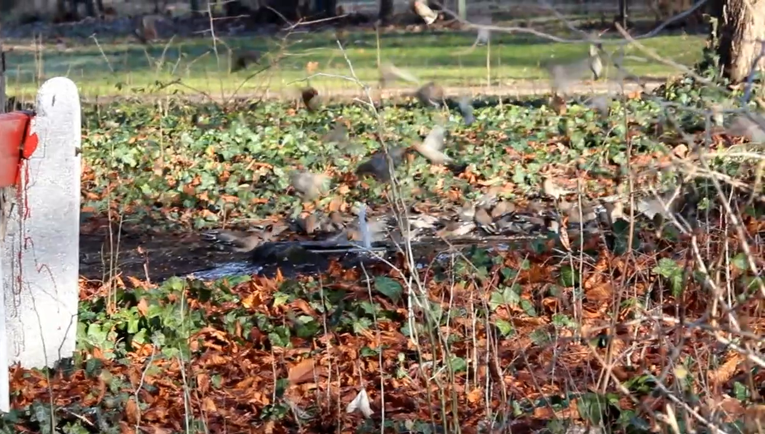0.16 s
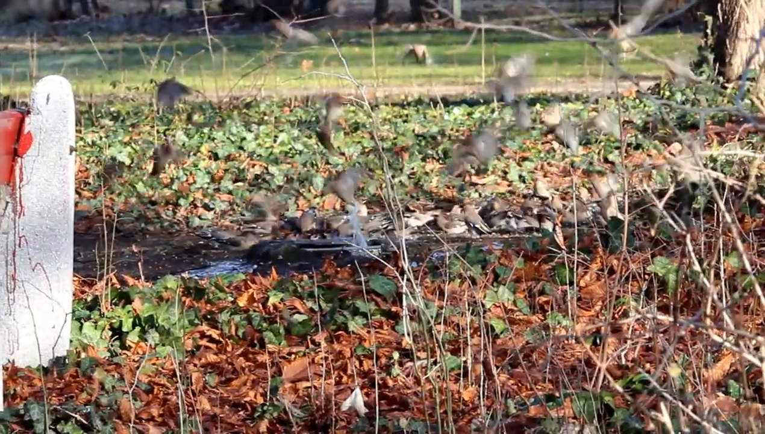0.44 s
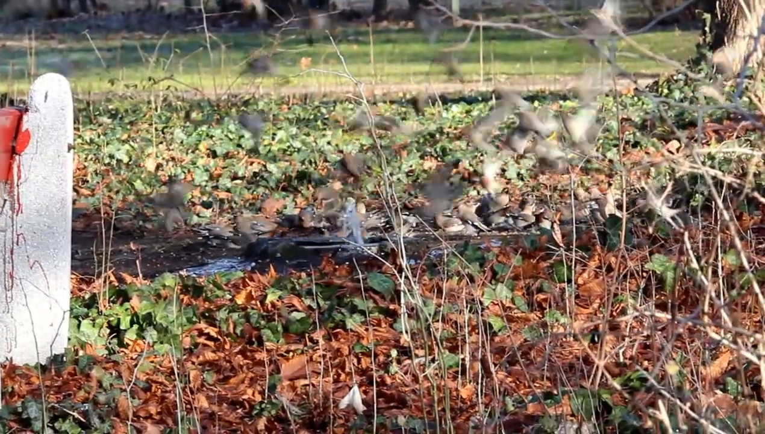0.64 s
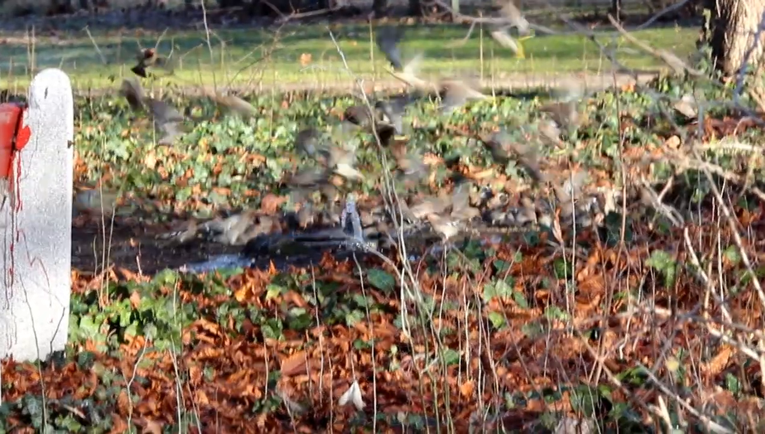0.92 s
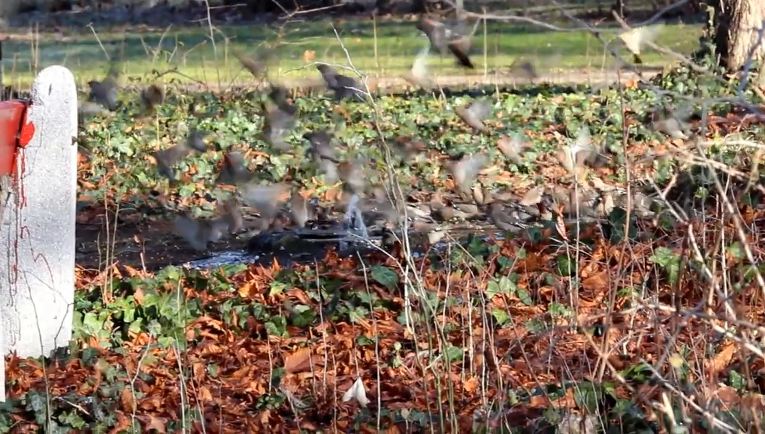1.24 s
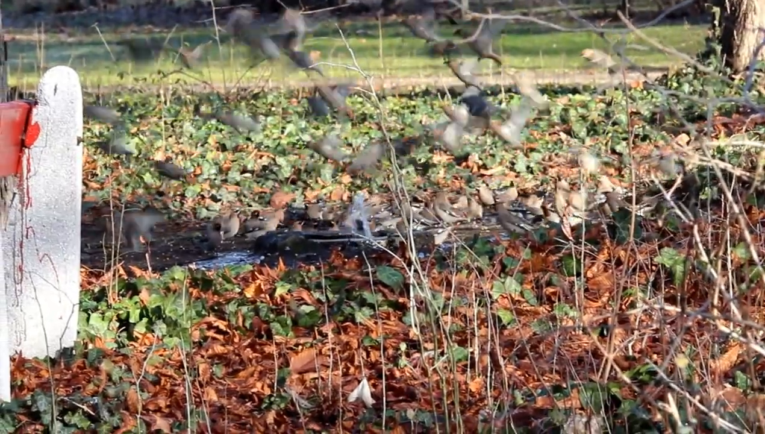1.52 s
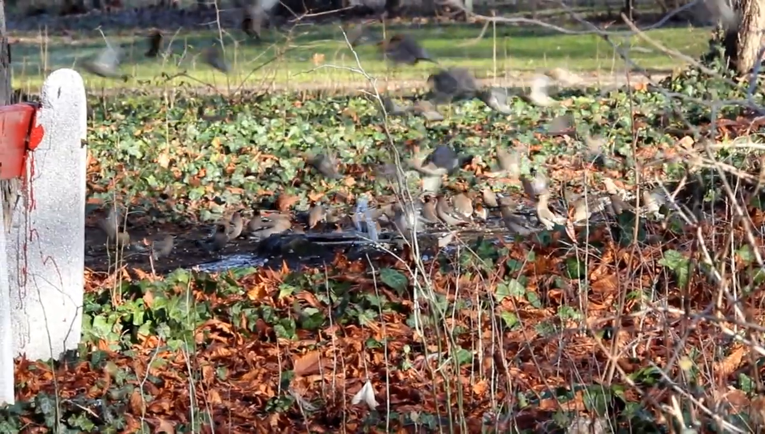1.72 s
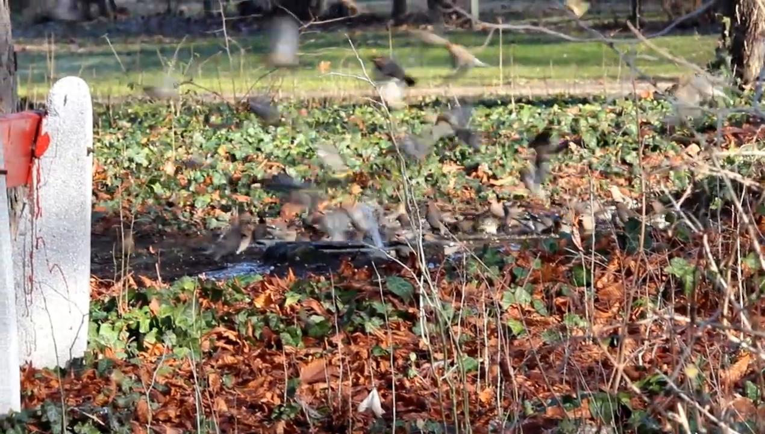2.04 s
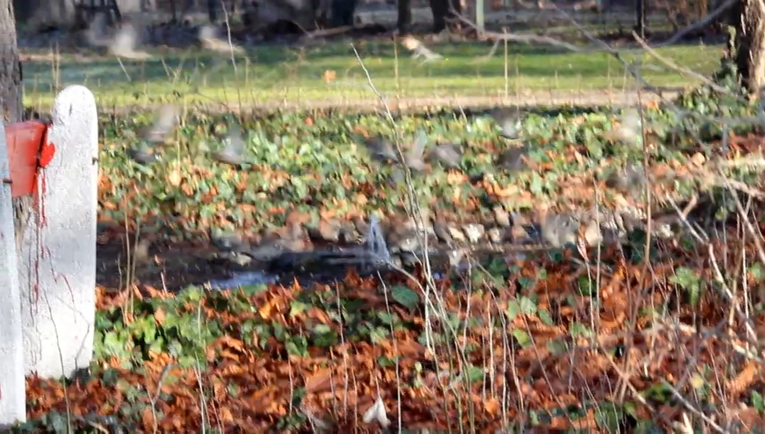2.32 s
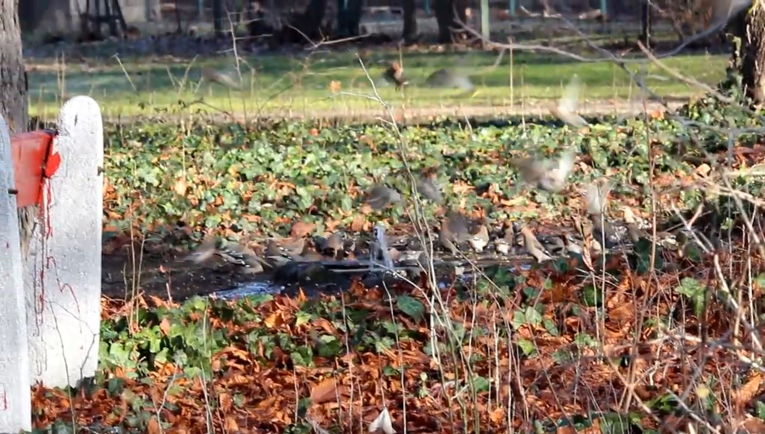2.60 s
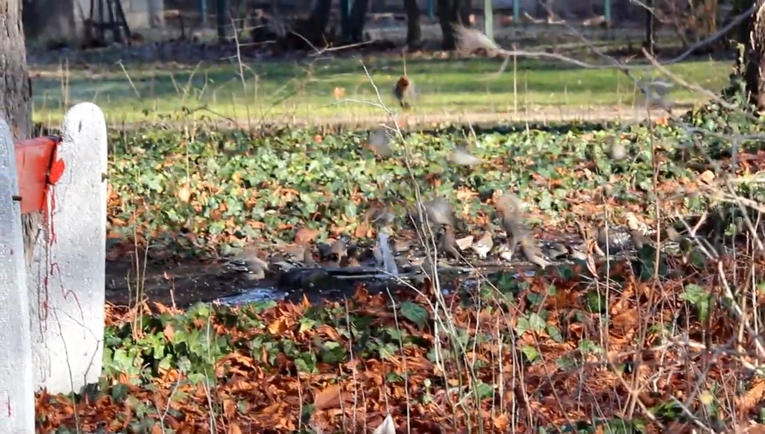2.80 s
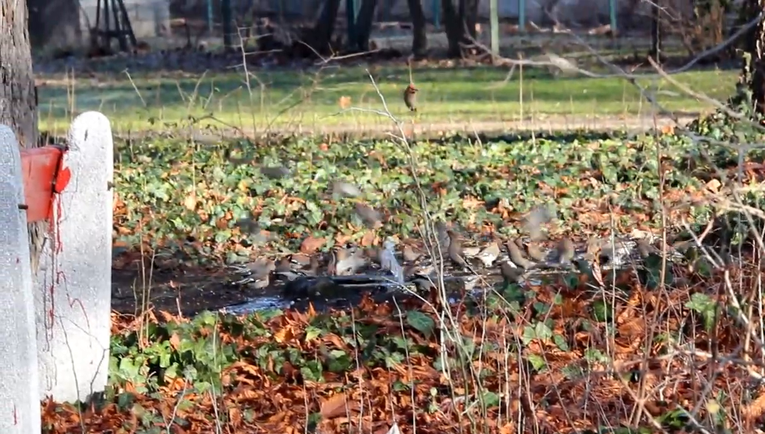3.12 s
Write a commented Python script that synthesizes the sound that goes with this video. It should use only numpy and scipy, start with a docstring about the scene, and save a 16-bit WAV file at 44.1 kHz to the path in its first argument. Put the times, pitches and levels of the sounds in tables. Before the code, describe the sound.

Near the microphone, thin high bird trills start after a brief lead-in, thicken, pause around two and a half seconds, then resume; feathers flutter, drops tick, and distant engines throb low behind.

```python
"""In a park, a flock of waxwings trills while it flutters round a puddle close to the microphone.
Each trill is a string of falling whistled notes: gliding sines with a weak octave, from near and farther birds.
Lower chirps and a thin high squeal are gliding sines too; wings, drops and dry leaves are shaped noise.
Distant traffic is a soft stereo roar of filtered noise; two engines, low tones with weak overtones,
beat against each other. A few reflections and a short diffuse tail surround the birds."""
import sys
import numpy as np
from scipy import signal
from scipy.fft import rfft, irfft
from scipy.io import wavfile
from scipy.ndimage import uniform_filter1d

SR = 44100
rng = np.random.default_rng(int(sys.argv[2]) if len(sys.argv) > 2 else 0)


def bounce(signal):
    """Save signal as a 16-bit WAV file at the path given by the first command-line argument."""
    frames = np.transpose(np.atleast_2d(signal))
    limited = np.clip(frames, -1, 1)
    pcm = np.round(limited * 32767).astype(np.int16)
    wavfile.write(sys.argv[1], SR, pcm)


N = 143766
TIME = np.arange(N) / SR

# Near trill notes: (time of the top [s], fall [s], top [Hz], end [Hz], level before NOTE_DB and throat [dB])
TRILL_NOTES = [(0.018, 0.039, 7530, 5780, -60.5), (0.045, 0.033, 6020, 5600, -66),
               (0.095, 0.035, 6200, 5480, -72), (0.279, 0.03, 6340, 5900, -47.5),
               (0.327, 0.033, 6800, 5800, -46.5), (0.377, 0.038, 6480, 5750, -46.5),
               (0.43, 0.036, 6640, 5800, -47), (0.5, 0.027, 6940, 5980, -63),
               (0.534, 0.035, 5980, 5410, -57), (0.585, 0.03, 5960, 5180, -57),
               (0.635, 0.039, 6260, 5460, -56), (0.69, 0.042, 5900, 5230, -57),
               (0.748, 0.036, 6230, 5730, -52.5), (0.803, 0.037, 6100, 5270, -57),
               (0.857, 0.036, 6030, 5550, -54), (0.913, 0.039, 6050, 5300, -57),
               (0.968, 0.033, 6000, 5380, -60), (1.036, 0.025, 5680, 5220, -60),
               (1.09, 0.032, 5780, 5600, -60), (1.12, 0.023, 6700, 5980, -56),
               (1.168, 0.035, 7130, 5720, -57), (1.195, 0.03, 5900, 5600, -61),
               (1.228, 0.039, 6900, 5960, -58), (1.272, 0.038, 6780, 6380, -57),
               (1.28, 0.037, 6300, 5560, -66), (1.314, 0.04, 7300, 5980, -57),
               (1.34, 0.036, 5970, 5300, -61), (1.365, 0.03, 7240, 6000, -57),
               (1.4, 0.035, 5820, 5650, -57), (1.42, 0.038, 7030, 6040, -53),
               (1.45, 0.035, 6000, 5380, -62), (1.47, 0.03, 6980, 6080, -55.5),
               (1.505, 0.035, 6350, 5510, -57), (1.559, 0.04, 6150, 5560, -61),
               (1.575, 0.025, 7060, 6420, -60), (1.635, 0.047, 7110, 6840, -61),
               (1.75, 0.034, 6130, 5450, -53.5), (1.776, 0.027, 6570, 6160, -54),
               (1.805, 0.029, 6240, 5330, -52), (1.822, 0.035, 7070, 6160, -52),
               (1.853, 0.037, 6020, 5510, -53.5), (1.872, 0.028, 7180, 6120, -54),
               (1.897, 0.029, 6180, 5450, -51.5), (1.922, 0.035, 7180, 5890, -52.5),
               (1.952, 0.033, 5970, 5500, -51.5), (1.972, 0.028, 7040, 6180, -58),
               (1.997, 0.033, 6060, 5420, -52.5), (2.025, 0.03, 6760, 5920, -56),
               (2.052, 0.036, 6020, 5640, -52.5), (2.098, 0.029, 5910, 5530, -52),
               (2.15, 0.047, 6160, 5500, -53), (2.203, 0.039, 5930, 5420, -51.5),
               (2.257, 0.048, 6090, 5460, -51), (2.635, 0.022, 6700, 5660, -58),
               (2.645, 0.062, 7670, 6700, -61.5), (2.668, 0.032, 6400, 5850, -58),
               (2.712, 0.044, 6900, 5720, -54), (2.768, 0.035, 6660, 5860, -55),
               (2.824, 0.034, 6524, 5810, -55.5), (2.86, 0.035, 5860, 5500, -60),
               (2.888, 0.033, 6970, 6240, -57), (2.942, 0.035, 7100, 6140, -57),
               (2.988, 0.031, 7200, 6100, -56), (3.02, 0.027, 5620, 5280, -62),
               (3.043, 0.04, 7120, 5880, -57), (3.12, 0.034, 5820, 5390, -66),
               (3.18, 0.039, 5600, 5630, -58), (3.232, 0.027, 5620, 5220, -63)]
# How strongly the throat passes each pitch: (pitch [Hz], gain [dB])
THROAT_GAIN = [(5100, 0), (5450, -3), (5680, -0.5), (5950, -3), (6250, -1), (6700, -2), (7200, 2.5),
               (7800, -3)]
# Farther birds of the flock, all together: (time [s], level [dB])
FAR_FLOCK_LEVEL = [(0, -69), (.3, -60), (.6, -64), (.85, -60.5), (1.05, -62), (1.3, -59.5), (1.65, -65),
                   (1.9, -65), (2.25, -61), (2.42, -66), (2.6, -84), (2.75, -61.5), (3, -64), (3.26, -64)]
# Lower chirps: (time [s], length [s], start [Hz], end [Hz], peak sine level [dB])
LOW_CHIRPS = [(.267, 0.017, 3680, 2900, -51), (.333, .021, 4100, 2880, -49), (.407, 0.017, 4000, 2940, -47),
              (2.347, .02, 3470, 2630, -55)]
# The two voices of the high squeal: (time [s], mean pitch [Hz], mean level [dB])
UPPER_SQUEAL = [(.41, 12390, -66), (.428, 13040, -62), (.475, 12950, -58), (.492, 12750, -64),
                (.52, 13050, -62), (.542, 13000, -70), (.562, 13000, -64), (.578, 12850, -58),
                (.592, 12240, -68), (.62, 11500, -69)]
LOWER_SQUEAL = [(.44, 10800, -67), (.456, 10570, -68), (.52, 10480, -64), (.545, 10350, -73),
                (.572, 10100, -66), (.608, 9180, -71), (.63, 8930, -72)]
# Single close wing flaps: (time [s], level before the puff envelope [dB])
CLOSE_FLAPS = [(.745, -56), (.79, -53), (.828, -55), (1.165, -52.5), (1.256, -58), (1.29, -52),
               (1.345, -59), (1.462, -50), (1.815, -56), (1.922, -53), (1.982, -54), (2.04, -54),
               (2.748, -54), (2.77, -53), (2.815, -54), (2.85, -50), (2.89, -51.5), (2.928, -52),
               (3.037, -51), (3.088, -52), (3.165, -53)]
# Rustle of all the beating wings: (time [s], level [dB])
WING_LEVEL = [(0, -74), (.3, -59), (.55, -57), (.9, -56), (1.4, -58.5), (1.7, -56.5), (1.95, -57.5),
              (2.3, -57.5), (2.55, -66), (2.8, -60), (3.26, -56.5)]
# Relative spectrum of the feathers: (frequency [Hz], gain [dB])
WING_SPECTRUM = [(200, 2), (900, -6), (1800, 3), (3500, -2), (5000, -3.5), (8000, -13.5), (15000, -16.5)]
# Drops and dry leaves: (time [s], level before the decay envelope [dB], centre [Hz], width [octaves])
CLEAR_TICKS = [(0.361, -36, 9100, 0.43), (.414, -48, 11000, .6), (.808, -46, 9900, .5),
               (.9275, -33.5, 2100, 0.65), (0.953, -39, 10000, .3), (.986, -39, 9500, .4),
               (1.008, -45, 10980, .3), (1.043, -43, 2190, 0.64), (1.2525, -37, 6500, .8),
               (1.40, -39, 2300, .7), (1.419, -39.5, 7900, .6), (1.542, -34, 2380, 1),
               (1.587, -43, 11000, 0.44), (1.622, -37.5, 3800, 0.77), (1.674, -44, 11000, 0.17),
               (1.92, -38.5, 2560, 0.51), (1.972, -38, 2100, 0.42), (2.166, -40, 2500, 0.72),
               (2.349, -43.5, 10980, 0.52), (2.389, -45, 10500, .4), (2.633, -45, 7975, 0.52),
               (2.768, -41, 6000, 0.92), (2.859, -35, 8000, .25), (3.081, -42, 10500, 0.62),
               (3.1941, -32.5, 2550, 0.28)]
# Reflections from ground and trunks: (delay [s], gain [dB])
GROUND_AND_TRUNKS = [(.0031, -24.5), (.0074, -15.5)]
# Engines: (time [s], firing rate [Hz], level before overtone gains and drift [dB])
UPPER_ENGINE = [(0, 69, -46.5), (.4, 70.36, -40), (.65, 70.56, -46.5), (.8, 71.34, -50.5),
                (1.25, 71.43, -39.5), (1.7, 72.96, -41.5), (2.3, 74.53, -40.5), (2.6, 75.7, -48.5),
                (3.26, 74.6, -53)]
LOWER_ENGINE = [(0, 60.8, -45), (.45, 62.03, -47), (.8, 59.78, -46), (1.0, 59.4, -44.5), (1.3, 59.9, -42.5),
                (1.85, 58, -46), (2.4, 56.2, -45), (2.8, 55.7, -61), (3.26, 58.3, -47)]
# Gain of the firing rate and its overtones, in order: (gain [dB])
ENGINE_HARMONICS = [0.5, -14.5, -21]
# Relative spectrum of the far road: (frequency [Hz], gain [dB])
ROAD_SPECTRUM = [(15, -29), (30, -12), (55, 0.5), (85, 0.5), (110, -3.5), (170, -5), (320, -10.5),
                 (450, -11), (700, -10), (1000, -11.5), (1350, -17.5), (2000, -24), (3200, -29),
                 (5000, -32), (8000, -35), (10000, -36), (13000, -36), (16000, -39.5)]
# Left-right likeness of the road noise: (frequency [Hz], correlation [0 to 1])
ROAD_LIKENESS = [(20, 1), (1500, 1), (2800, 1), (5000, 0.91), (8000, .7), (16000, 0.58)]
# Road noise before its slow swell: (time [s], level [dB])
ROAD_LEVEL = [(0, -42.5), (.45, -41), (.8, -42), (1.4, -41), (2.0, -41.5), (2.45, -41.5), (2.9, -41),
              (3.26, -43)]

# Trill note: trim, flick up to the top, drop after the fall
NOTE_DB, RISE_S, RISE_HZ, RELEASE_S, DROP_HZ = 2.5, 0.008, 850, 0.006, 350
# Swell over the fall (LOUDEST_AT is a fraction of it), bow of the pitch slide, level of the octave
ONSET_DB, END_DB, LOUDEST_AT, SAG_HZ, OCTAVE_DB = -5.5, -7.5, 0.76, 59.6, -23
WAVER_HZ, SHIMMER_DB = 74, 2  # rms unsteadiness of pitch and of near level
# Farther birds: mean pitches of the lowest bird, spread up to the highest, typical spacing of notes
FAR_TOP_HZ, FAR_END_HZ, FAR_SPREAD_HZ, NOTE_GAP_S = 5920, 5450, 1400, 0.053
SCATTER_T60_S = 0.47
FLAP_S, FLAP_HZ, FLAP_OCTAVES = 0.006, 3150, 0.85
WINGBEATS_PER_S, WING_DEPTH_DB = 18, 4  # mean rate; swing each way
# Tick decay; mean rate and lowest level of the faint patter, before the decay envelope
TICK_DECAY_S, SPLASH_PER_S, SPLASH_DB = 0.00097, 70, -58
TAIL_T60_S, TAIL_DB = 0.33, -17
PATCH_DB, SWELL_DB = 1.15, 0.4  # rms unevenness of the road spectrum and of its level
EDGE_HZ = 15900


def amp(db):
    """Decibels to gain."""
    return 10 ** (np.asarray(db) / 20)


def unit(x):
    """Scales to rms 1."""
    return x / np.sqrt(np.mean(x ** 2) + 1e-20)


def at_hz(points, hz):
    """Reads a spectrum on a log-frequency axis."""
    f, value = np.transpose(points)
    return np.interp(np.log(hz + 1), np.log(f + 1), value)


def at_time(rows, t):
    """Reads every column of a curve at the times t."""
    s, *columns = np.transpose(rows)
    return [np.interp(t, s, c) for c in columns]


def add(mix, s, sound):
    """Mixes a sound in at s seconds, trimmed at the ends of the mix."""
    start = round(s * SR)
    sound = sound[max(-start, 0):]
    part = mix[max(start, 0):][:len(sound)]
    part += sound[:len(part)]


def wander(rate_hz):
    """Smooth random drift of rms 1."""
    hz = np.fft.rfftfreq(N, 1 / SR)
    return unit(irfft(rfft(rng.standard_normal(N)) * np.exp(-(hz / rate_hz) ** 2), N))


def phase_of(hz):
    """Running phase of a pitch curve."""
    return 2 * np.pi * np.cumsum(hz) / SR


def band(noise, centre_hz, octaves):
    """Noise narrowed round one frequency, at rms 1."""
    hz = np.fft.rfftfreq(len(noise), 1 / SR)
    distance = np.log2((hz + 1) / centre_hz) / octaves
    return unit(irfft(rfft(noise) * np.exp(-0.5 * distance ** 2)))


def note(fall_s, top_hz, end_hz, waver):
    """One trill note: the whistle flicks up, slides down as it swells, and drops away."""
    t = np.arange(-RISE_S, fall_s + RELEASE_S, 1 / SR)
    u = np.clip(t / fall_s, 0, 1)
    before = np.clip(-t / RISE_S, 0, 1)
    after = np.clip((t - fall_s) / RELEASE_S, 0, 1)
    hz = top_hz + (end_hz - top_hz) * u - SAG_HZ * np.sin(np.pi * u)
    hz = hz - RISE_HZ * before ** 2 - DROP_HZ * after
    phase = phase_of(hz + WAVER_HZ * waver[:len(t)])
    swell_db = np.interp(u, [0, LOUDEST_AT, 1], [ONSET_DB, 0, END_DB])
    envelope = np.sqrt(2 * (1 - before ** 2)) * (1 - after) * amp(swell_db + at_hz(THROAT_GAIN, hz))
    return envelope * (np.sin(phase) + amp(OCTAVE_DB) * np.sin(2 * phase))


def near_trills():
    """The birds nearest the microphone, whistled note by note with a shimmering level."""
    out, waver = np.zeros(N), wander(300)
    for s, fall_s, top_hz, end_hz, db in TRILL_NOTES:
        whistle = note(fall_s, top_hz, end_hz, np.roll(waver, -round(s * SR)))
        add(out, s - RISE_S, amp(db + NOTE_DB) * whistle)
    return out * amp(SHIMMER_DB * wander(180))


def far_trills(count=8):
    """Farther birds trill on, each round its own pitch at an uneven pace, blurred by the trees."""
    out, waver = np.zeros(N), wander(300)
    for height in np.linspace(0, 1, count) ** 2:
        top_hz = FAR_TOP_HZ + FAR_SPREAD_HZ * height
        end_hz = FAR_END_HZ + FAR_SPREAD_HZ * height / 2
        s = -rng.random() * NOTE_GAP_S
        for pace, pitch in rng.standard_normal((70, 2)):
            shift_hz = 130 * pitch
            add(out, s, note(0.027, top_hz + shift_hz, end_hz + shift_hz, np.roll(waver, -round(s * SR))))
            s += NOTE_GAP_S * np.exp(0.061 * pace)
    t = TIME[:SR // 2]
    scatter = rng.standard_normal(len(t)) * amp(-60 * t / SCATTER_T60_S)
    blurred = signal.fftconvolve(out, scatter)[:N]
    return unit(blurred) * amp(at_time(FAR_FLOCK_LEVEL, TIME)[0])


def chirps():
    """Short, steeply falling sine chirps below the trills, each swelling and fading."""
    out = np.zeros(N)
    for s, length, start_hz, end_hz, db in LOW_CHIRPS:
        u = np.arange(0, length, 1 / SR) / length
        phase = phase_of(start_hz + (end_hz - start_hz) * u ** 0.836)
        add(out, s, amp(db) * np.sqrt(2) * np.sin(np.pi * u) * np.sin(phase))
    return out


def squeal(voice):
    """One thin voice of the high squeal: a sine unsteady in pitch and level."""
    hz, db = at_time(voice, TIME)
    sounding = (TIME > voice[0][0]) & (TIME < voice[-1][0])
    gate = uniform_filter1d(1.0 * sounding, size=200)  # softened edges
    level = np.sqrt(2) * gate * amp(db + 2 * wander(120))
    return level * np.sin(phase_of(hz + 70 * wander(300)))


def flaps():
    """Soft puffs from the wings of the closest birds: band noise under a bell-shaped envelope."""
    out = np.zeros(N)
    for (s, db), noise in zip(CLOSE_FLAPS, rng.standard_normal((len(CLOSE_FLAPS), 2048))):
        t = TIME[:len(noise)] - TIME[len(noise) // 2]
        puff = band(noise, FLAP_HZ, FLAP_OCTAVES) * np.exp(-0.5 * (t / FLAP_S) ** 2)
        add(out, s + t[0], amp(db) * puff)
    return out


def wings(count=3):
    """Feathers of a few birds: coloured noise that puffs up on every wing beat."""
    out, hz = np.zeros(N), np.fft.rfftfreq(N, 1 / SR)
    for _ in range(count):
        rustle = irfft(rfft(rng.standard_normal(N)) * amp(at_hz(WING_SPECTRUM, hz)), N)
        rate = WINGBEATS_PER_S * (1 + 0.147 * wander(4.04))
        beat = np.sin(phase_of(rate) + 2 * np.pi * rng.random())
        out += rustle * amp(WING_DEPTH_DB * beat + 4.5 * wander(6.7))
    return unit(out) * amp(at_time(WING_LEVEL, TIME)[0])


def tick(centre_hz, octaves, noise):
    """A tiny burst of band noise with a sharp onset that dies within milliseconds."""
    t = TIME[:len(noise)]
    return band(noise, centre_hz, octaves) * np.exp(-t / TICK_DECAY_S) * (1 - np.exp(-t / 0.00012))


def ticks():
    """Drops and dry leaves: clear ticks close by, and a randomly timed patter of mostly fainter ones."""
    out = np.zeros(N)
    for (s, db, centre_hz, octaves), noise in zip(CLEAR_TICKS, rng.standard_normal((len(CLEAR_TICKS), 1024))):
        add(out, s - TICK_DECAY_S / 2, amp(db) * tick(centre_hz, octaves, noise))
    s = 0
    for (wait, pitch, loud), noise in zip(rng.random((300, 3)), rng.standard_normal((300, 1024))):
        s -= np.log(1 - wait) / SPLASH_PER_S  # exponential waiting times
        centre_hz = 2100 * 5 ** (pitch ** 2)
        add(out, s, amp(SPLASH_DB + 12.4 * loud ** 2) * tick(centre_hz, 0.54, noise))
    return out


def park(x):
    """The place round the birds: ground and trunk reflections, then a short diffuse stereo tail."""
    t = np.arange(SR // 2) / SR
    decay = amp(-60 * t / TAIL_T60_S) * (1 - np.exp(-t / 0.012))
    mid, side = rng.standard_normal((2, len(t))) * decay
    response = np.array([mid + 0.1 * side, mid - 0.1 * side])
    response *= amp(TAIL_DB) / np.linalg.norm(mid)
    response[:, 0] += 1  # direct sound
    for delay, db in GROUND_AND_TRUNKS:
        response[:, round(delay * SR)] += amp(db)
    return signal.fftconvolve(x[None], response, axes=1)[:, :N]


def engine(curve):
    """A distant exhaust: sines at the firing rate and two weak overtones, each drifting in level."""
    hz, db = at_time(curve, TIME)
    phase, out = phase_of(hz), np.zeros(N)
    for k, gain_db in enumerate(ENGINE_HARMONICS, 1):
        out += amp(db + gain_db + 1.9 * wander(7)) * np.sin(k * phase)
    return np.sqrt(2) * out


def traffic():
    """Far road noise: random spectra with drifting patches, thinning to a faint, wider hiss on top."""
    hz, frames = np.fft.rfftfreq(2048, 1 / SR), N // 512 + 5
    a, b, c, d, patches = rng.standard_normal((frames, len(hz), 5)).T
    # patches is frequency by frame: smooth along both
    patches = uniform_filter1d(patches, size=14, axis=0)
    patches = unit(uniform_filter1d(patches, size=6, axis=1))
    same = np.clip(at_hz(ROAD_LIKENESS, hz), 0, 1)[:, None]
    mid = np.sqrt(1 + same) * (a + 1j * b)
    side = np.sqrt(1 - same) * (c + 1j * d)
    colour = amp(at_hz(ROAD_SPECTRUM, hz)[:, None] + PATCH_DB * patches)
    spectra = np.array([mid + side, mid - side]) * colour
    roar = signal.istft(spectra, nperseg=2048, noverlap=1536)[1][:, :N]
    return amp(at_time(ROAD_LEVEL, TIME)[0] + SWELL_DB * wander(2.6)) * unit(roar)


def scene():
    """The flock straight ahead of the microphone, the road and engines far behind."""
    voices = near_trills() + far_trills() + chirps() + squeal(UPPER_SQUEAL) + squeal(LOWER_SQUEAL)
    birds = voices + ticks() + wings() + flaps()
    return park(birds) + traffic() + engine(UPPER_ENGINE) + engine(LOWER_ENGINE)


def record(dry):
    """The recorder's band limit: a steep low-pass on both channels."""
    lowpass = signal.firwin(511, EDGE_HZ, window=("kaiser", 9), fs=SR)
    return signal.oaconvolve(dry, lowpass[None], "same")


dry = scene()
out = record(dry)
bounce(out)
```